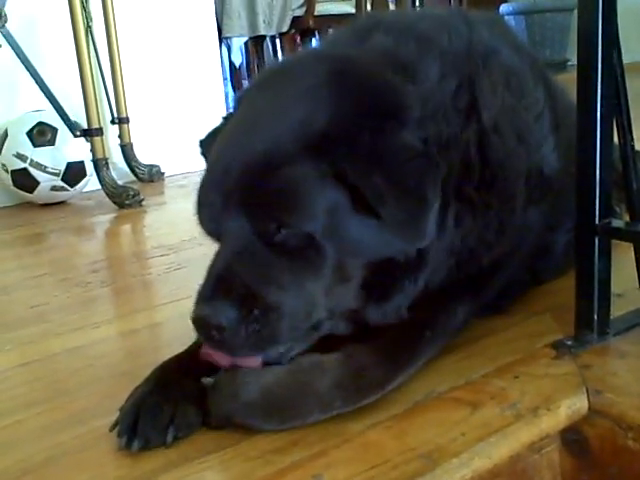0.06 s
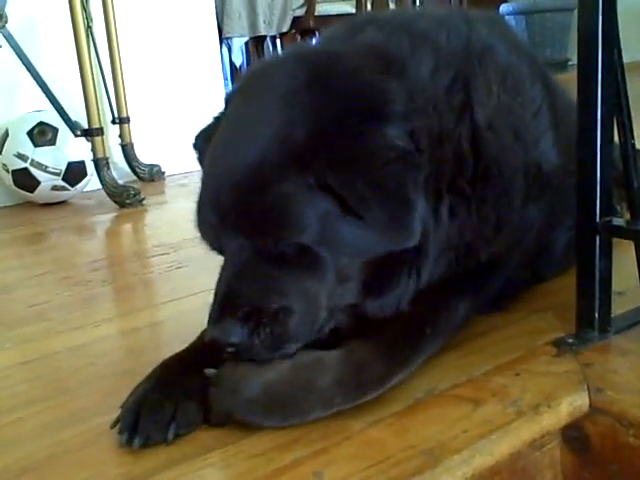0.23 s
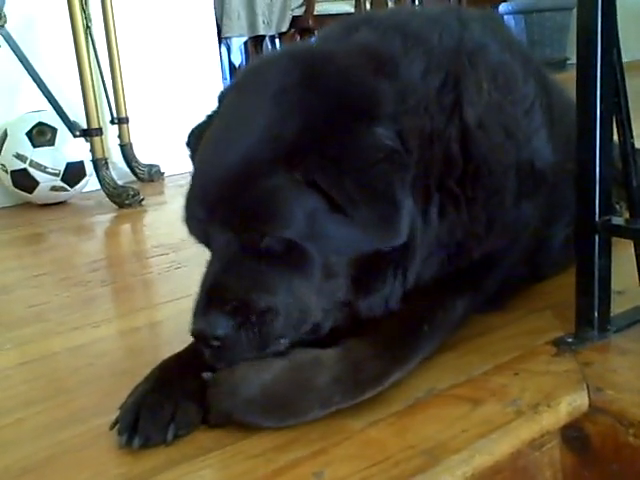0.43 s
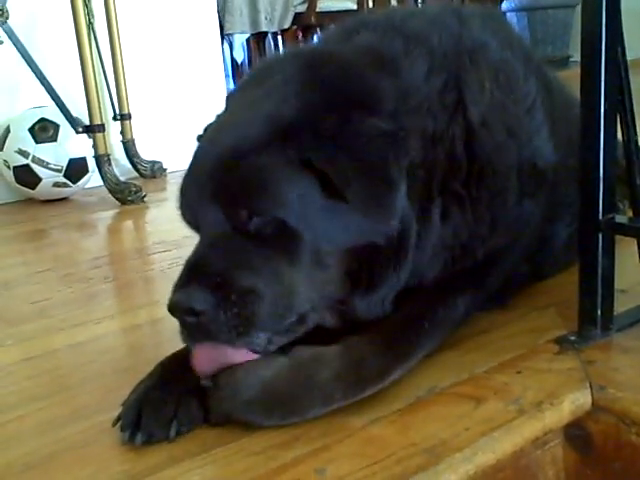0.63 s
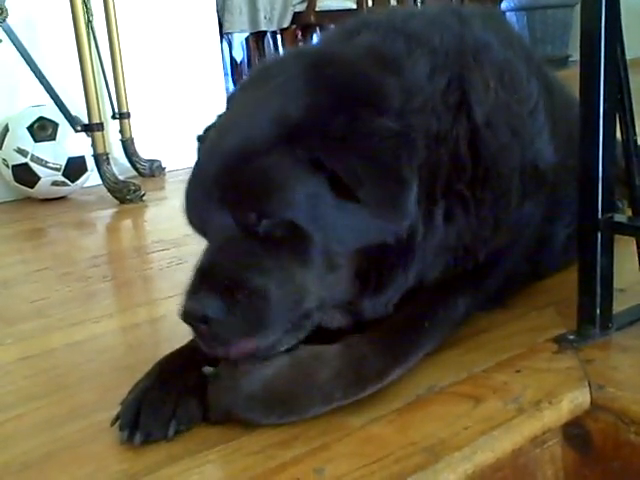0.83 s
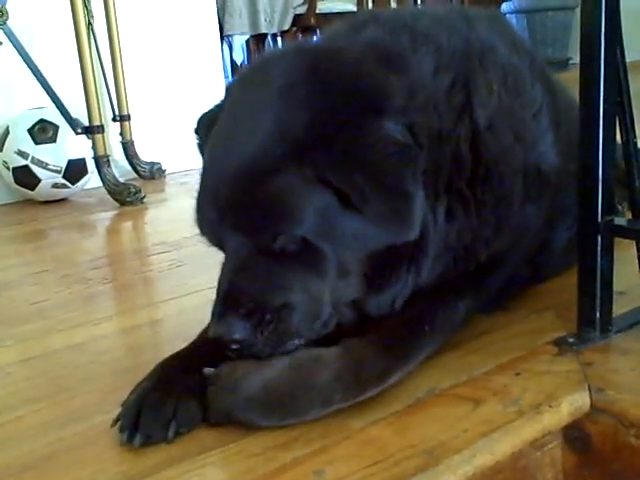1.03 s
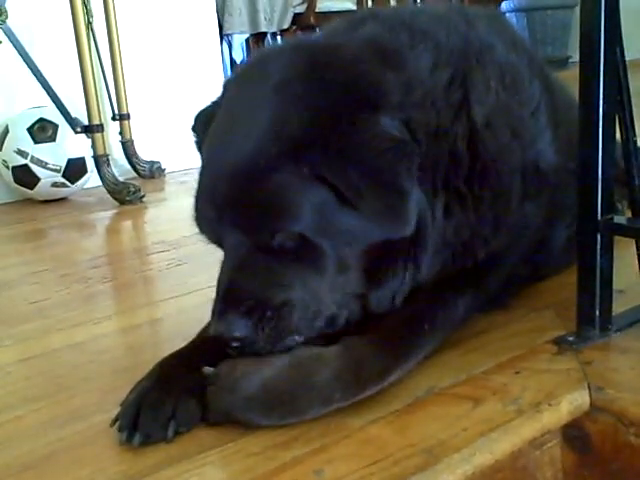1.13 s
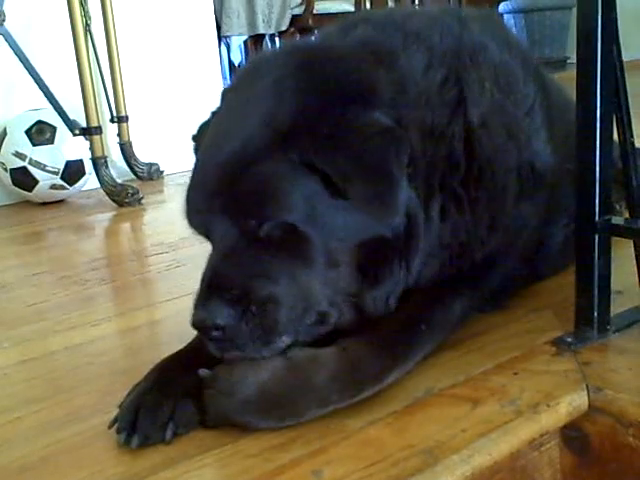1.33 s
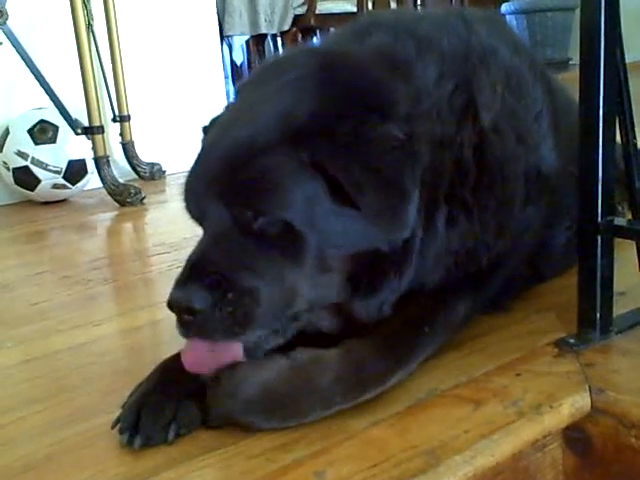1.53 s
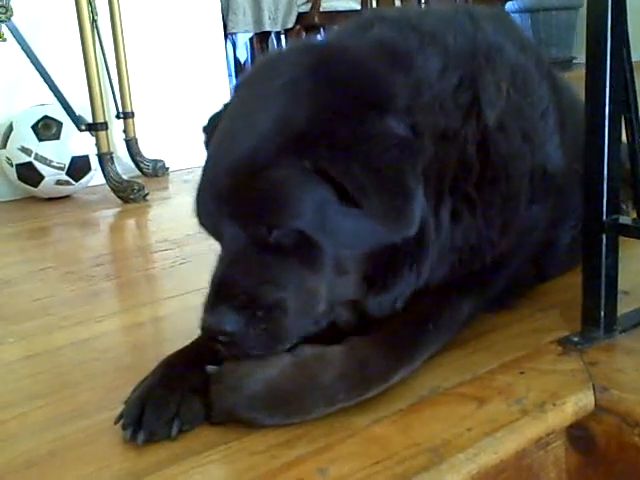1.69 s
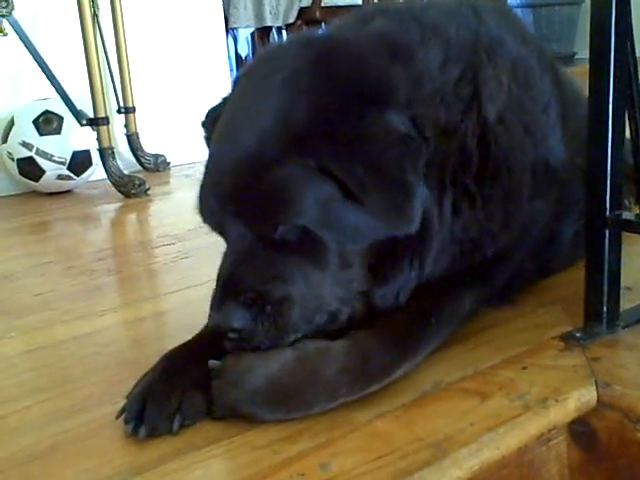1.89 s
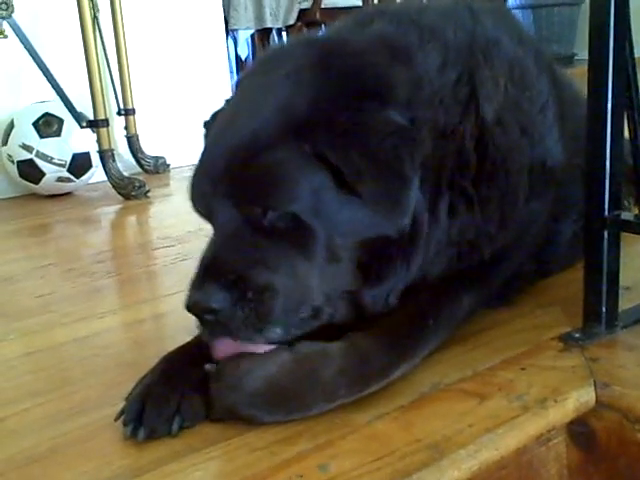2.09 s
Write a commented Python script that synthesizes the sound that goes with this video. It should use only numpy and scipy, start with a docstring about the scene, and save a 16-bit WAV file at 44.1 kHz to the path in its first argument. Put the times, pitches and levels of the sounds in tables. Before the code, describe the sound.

Dog licking its paw with soft wet rasps and clicks, plus four hard knocks on wood

```python
"""Dog licking its paw, and four knocks on wood

A dog licks its paw on a wooden floor: shaped noise rasps softly as tongue on fur, short rings snap as wet clicks.
Four hard knocks on a hollow wooden panel stack noise cracks, a snap near 6.5 kHz, dying panel modes and room tails.
Low rumble, faint hiss and a drone lie beneath, and the knocks overload a small microphone."""
import sys
import numpy as np
from scipy import signal
from scipy.fft import rfft, irfft, next_fast_len
from scipy.io import wavfile

SR = 44100
rng = np.random.default_rng(int(sys.argv[2]) if len(sys.argv) > 2 else 0)


def master_out(mix):
    """Clip the mix to full scale and print it as 16-bit PCM to the path in sys.argv[1]."""
    frames = np.transpose(np.atleast_2d(mix))
    ceiling = np.clip(frames, -1, 1)
    pcm = np.round(ceiling * 32767).astype(np.int16)
    wavfile.write(sys.argv[1], SR, pcm)


def field_ratio(decibels):
    """Amplitude ratio for a level in dB (20 dB per decade); scalars and array-likes work."""
    return 10 ** (np.asarray(decibels, dtype=float) / 20)


N = 94815  # length in samples


def unit(x):
    """Scales a signal to rms 1."""
    return x / np.sqrt(np.mean(x ** 2) + 1e-20)


def along(points, hz):
    """Reads a curve of (Hz, value) points on a log frequency axis."""
    point_hz, value = np.transpose(points)
    return np.interp(np.log(hz + 1), np.log(point_hz + 1), value)


def coloured(x, points):
    """Passes x through a causal minimum-phase filter of (Hz, relative dB) points with mean power gain 1."""
    size = 2 * next_fast_len(len(x) // 2 + 4096)
    gain = field_ratio(np.maximum(along(points, np.fft.rfftfreq(size, 1 / SR)), -70))
    # folding the cepstrum forward in time makes the filter causal
    cepstrum = irfft(np.log(unit(gain)), size)
    cepstrum[1:size // 2] *= 2
    cepstrum[size // 2 + 1:] = 0
    response = np.exp(rfft(cepstrum))
    return irfft(rfft(x, size) * response, size)[:len(x)]


def add(track, start_s, sound):
    """Lays a sound into the track at a time, cut at the track's end."""
    part = track[round(start_s * SR):][:len(sound)]
    part += sound[:len(part)]


def ring(t, hz, db, t60, phase=0):
    """A sine that loses 60 dB in t60 seconds, as a damped resonance does."""
    return field_ratio(db - 60 * t / t60) * np.sin(2 * np.pi * hz * t + phase)


def room_tail():
    """One second of fresh reverberant noise in which each frequency dies at its own speed."""
    # decay time of the room: pitch_hz, t60_s
    decay_times = [(60, 1), (160, 0.49), (420, 0.43), (1100, .5), (2900, 0.47), (7000, 0.44)]
    rise_s = 0.0013
    hz, t, spectrum = signal.stft(rng.standard_normal(SR), SR, nperseg=512)
    decay = field_ratio(-60 * t / along(decay_times, hz)[:, None])
    tail = signal.istft(spectrum * decay, SR, nperseg=512)[1][:SR]
    return tail * (1 - np.exp(-np.arange(SR) / SR / rise_s))


def room_air():
    """Low rumble and faint hiss are filtered noise; narrow noise bands waver as an appliance drone."""
    # colour of the room air: pitch_hz, relative level_db
    air_colour = [(12, -74.5), (20, 5.5), (48, 0.5), (121, -0.5), (282, -11.5), (347, -15), (497, -21),
                  (1100, -29), (1620, -27.5), (2380, -34), (6660, -34), (9300, -43), (12100, -111),
                  (20500, -120)]
    # partials of the drone: pitch_hz, level_db (rms), width_hz
    drone_partials = [(97.9, -50.5, 5.8), (196.8, -57.5, 3), (622, -73.5, 10), (853, -72.5, 17)]
    air_db = -46  # rms
    freqs = np.fft.rfftfreq(N, 1 / SR)
    drone = np.zeros(N)
    for hz, db, width_hz in drone_partials:
        band = np.exp(-((freqs - hz) / width_hz) ** 2)
        drone += field_ratio(db) * unit(irfft(rfft(rng.standard_normal(N)) * band, N))
    return field_ratio(air_db) * coloured(rng.standard_normal(N), air_colour) + drone


def tongue():
    """Friction of the tongue over fur: noise that is part smooth hiss, part saliva crackle."""
    # outline of the strokes: start_s, level_db (rms), crackle share of the power (0-1)
    strokes = [(0, -52, 0.13), (.07, -46.5, 0.4), (.11, -46, 0.35), (.14, -55.5, 0.4), (.165, -47, 0.5),
               (.2, -58, 0), (0.233, -50.5, 0.64), (0.559, -58.5, 0), (.68, -51, 0.6), (.78, -42, 0.09),
               (.83, -53, 0.3), (.87, -52, 1), (.95, -54, 0.73), (1.08, -63.5, .2), (1.129, -56.5, 1),
               (1.2, -54.5, 0.7), (1.26, -56, 0.35), (1.33, -66, .1), (1.39, -47.5, 0.3), (1.44, -50, .1),
               (2.02, -59, .1), (2.08, -66, 0), (2.11, -51.5, 0), (2.15, -56, 0)]
    # colour of the fur's rasp: pitch_hz, relative level_db
    fur_colour = [(1470, -75.5), (2500, -26.5), (3610, -27), (4500, -26.5), (5990, -12), (6540, -7),
                  (7710, -19), (8800, -16.5), (9300, -31.5), (12100, -82), (20500, -120)]
    crackle_per_s, crackle_t60_s, crackle_spread_db = 500, 0.004, 1.8
    start_s, level_db, crackle_share = np.transpose(strokes)
    t = np.arange(N) / SR
    share = np.interp(t, start_s, crackle_share)
    # random pops of uneven strength, each a tiny dying burst of noise
    pops = rng.random(N) < crackle_per_s / SR
    pops = pops * field_ratio(crackle_spread_db * rng.exponential(size=N))
    decay = field_ratio(-60 * t[:400] / crackle_t60_s)
    crackle = np.convolve(pops, decay)[:N] * rng.standard_normal(N)
    rasp = np.sqrt(1 - share) * rng.standard_normal(N) + np.sqrt(share) * unit(crackle)
    return field_ratio(np.interp(t, start_s, level_db)) * coloured(rasp, fur_colour)


def wet_clicks():
    """Saliva threads snap as two short rough rings each with a little room; two bubbles plop as dying sines."""
    # snapping threads: start_s, level_db, low ring pitch_hz, low ring db against the high ring, t60_s
    threads = [(.1195, -36, 5000, -12, .004), (.123, -37, 5000, -12, .004), (.1815, -40, 5000, -12, .003),
               (.864, -41, 5500, 0, .008), (.8734, -21, 4700, -1, .0035), (.8805, -37, 4500, -5, .002),
               (.8895, -36, 5500, -5, .002), (.897, -37, 5000, -12, .008), (.906, -34, 5000, -12, .005),
               (.9077, -35, 5000, -12, .003), (.913, -36, 5000, -12, .005), (.9176, -14, 1500, -19, .0018),
               (.9305, -37, 5300, 0, .005), (.9385, -35, 5500, -9, .005), (.944, -36, 5000, -12, .005),
               (.9457, -35, 5000, -12, .004), (.9515, -36, 5500, -8, .004), (1.1002, -39, 5800, -3, .004),
               (1.1013, -35, 3000, 0, .004), (1.108, -42, 3500, -3, .005), (1.1375, -34, 3000, -7, .003),
               (1.1465, -37, 5000, -3, .003), (1.1494, -17, 5200, -3, .0028), (1.153, -26, 5700, -2, .006),
               (1.176, -38, 3300, 0, .003), (1.1915, -38, 4000, -6, .006), (1.1975, -32, 5500, -3, .004)]
    # saliva bubbles: start_s, level_db, pitch_hz, t60_s
    bubbles = [(0.171, -48, 2050, 0.023), (1.176, -46.5, 660, 0.028)]
    high_ring_hz, rise_s, roughness, room_db = 6500, 0.0002, 0.19, -16
    clicks = np.zeros(N)
    t = np.arange(2000) / SR
    for start_s, db, low_hz, low_db, t60 in threads:
        rings = ring(t, high_ring_hz, 0, t60) + ring(t, low_hz, low_db, t60)
        rough = 1 + roughness * rng.standard_normal(len(t))
        add(clicks, start_s, field_ratio(db) * rings * (1 - np.exp(-t / rise_s)) * rough)
    tail = room_tail()
    clicks += field_ratio(room_db) * signal.fftconvolve(clicks, tail / np.linalg.norm(tail))[:N]
    for start_s, db, hz, t60 in bubbles:
        add(clicks, start_s, ring(t, hz, db, t60))
    return clicks


def crack_and_snap(cracks, snaps, t, start_s, crack_db, snap_hz):
    """Contact of one blow: a noise crack and a bright ring, repeated as wall echoes with scattered pitch."""
    # direct sound, then wall echoes: delay_s, snap level_db, grit level_db (both against the crack level)
    echoes = [(0, 5, 1.5), (.0032, -11, -12), (.0075, -37.5, -23.5), (.0150, -32.5, -21), (.0245, -14, -18),
              (.0278, -4.5, -20), (.0309, -9.5, -21)]
    crack_t60_s = 0.014
    snap_t60_s, snap_rise_s, echo_pitch_scatter = 0.0056, 0.00013, 0.031
    for delay_s, snap_db, grit_db in echoes:
        grit = field_ratio(crack_db + grit_db - 60 * t / crack_t60_s) * rng.standard_normal(len(t))
        add(cracks, start_s + delay_s, grit)
        scatter = echo_pitch_scatter * rng.normal() * (delay_s > 0)
        snap = ring(t, snap_hz * (1 + scatter), crack_db + snap_db, snap_t60_s)
        add(snaps, start_s + delay_s, snap * (1 - np.exp(-t / snap_rise_s)))


def panel_blow(t):
    """Body of one blow: the hollow panel's modes ring with wandering phase over a short thump."""
    # modes of the panel: pitch_hz, relative level_db, t60_s
    panel_modes = [(88.8, -19.5, 1), (94.2, -14, 0.58), (105.8, -3.5, 0.1), (147.3, -3.5, 0.21),
                   (245.7, -15, .2), (329, -9, 0.17), (360.5, -15.5, .3), (394.6, 0.5, 0.088),
                   (428.5, -1, 0.2), (566.3, -4.5, 0.11), (681, -17.5, 0.34), (739, -20, 0.59),
                   (753.5, -26, 0.14), (766, -30, 0.11), (909, -27.5, 0.29), (1167, -35, 0.32)]
    # push of the blow itself: pitch_hz, relative level_db, t60_s
    thump_rings = [(345, 12, .022), (156, 7, 0.02), (1137, -3, 0.018)]
    rise_s, level_scatter_db = 0.0024, 2.5
    wander_rad = 0.35  # rms phase drift after 0.1 s
    modes = np.zeros(len(t))
    for hz, db, t60 in panel_modes:
        phase = wander_rad * np.cumsum(rng.standard_normal(len(t))) / np.sqrt(SR / 10)
        modes += ring(t, hz, db + level_scatter_db * rng.normal(), t60, phase)
    thump = sum(ring(t, hz, db, t60) for hz, db, t60 in thump_rings)
    return modes * (1 - np.exp(-t / rise_s)) + thump


def knocks():
    """Each blow sets off a crack with wall echoes, the panel's body and the room's quick and slow tails."""
    # blows: start_s, crack_db, snap pitch_hz, panel_db, room_db (relative levels)
    blows = [(0.2485, 0, 6810, -2.5, -7.5), (1.4401, -5.5, 6500, -7.5, -14),
             (1.5949, -3.5, 6390, -10.5, -17.5), (1.7472, -1, 5870, -6, -14)]
    # first contacts just before a blow: start_s, relative level_db, t60_s
    lead_ticks = [(.2437, -21, .04), (.2466, -13, .015), (1.4384, -19, .02), (1.4393, -12, .01)]
    # colour of the crack: pitch_hz, relative level_db
    crack_colour = [(500, -56), (1000, -1.5), (1600, -15), (2800, -12.5), (4300, -6.5), (5200, -12.5),
                    (6540, -2), (8000, -16.5), (9300, -14), (12000, -87)]
    # colour of the room's quick answer: pitch_hz, relative level_db
    boom_colour = [(24, -59), (40, -20.5), (91, -8), (154, -16.5), (202, -12), (333, -5.5), (365, 1),
                   (631, -14.5), (740, -12.5), (1400, -29), (4380, -29.5), (6760, -21.5), (9300, -43),
                   (12100, -108.5), (20500, -120)]
    # colour of the slow tail of the house: pitch_hz, relative level_db
    linger_colour = [(60, -19.5), (100, -7), (200, -6.5), (350, 6.5), (450, -2.5), (750, -5), (1100, -15),
                     (1700, -15.5), (3500, -29.5), (6000, -46)]
    panel_delay_s = 0.0016
    linger_db, linger_t60_s = -25.5, 1.19  # level against the quick room tail
    cracks, snaps, panel, boom, linger = np.zeros((5, N))
    t = np.arange(SR) / SR
    short_t = t[:900]
    for start_s, crack_db, snap_hz, panel_db, room_db in blows:
        crack_and_snap(cracks, snaps, short_t, start_s, crack_db, snap_hz)
        add(panel, start_s + panel_delay_s, field_ratio(panel_db) * panel_blow(t))
        add(boom, start_s, field_ratio(room_db) * room_tail())
        slow_decay = field_ratio(room_db + linger_db - 60 * t / linger_t60_s)
        add(linger, start_s, slow_decay * rng.standard_normal(SR))
    for start_s, db, t60 in lead_ticks:
        add(cracks, start_s, field_ratio(db - 60 * short_t / t60) * rng.standard_normal(len(short_t)))
    tails = coloured(boom, boom_colour) + coloured(linger, linger_colour)
    return coloured(cracks, crack_colour) + snaps + panel + tails


def scene():
    """All sources summed at one microphone."""
    return (room_air() + tongue() + wet_clicks() + knocks())[None]


def top_cut(x):
    """Nothing passes above the cut-off."""
    return signal.sosfilt(signal.butter(12, 17140, fs=SR, output="sos"), x)


def record(dry):
    """The small microphone ends near 9 kHz; its input then clips and rolls off gently."""
    mic_stop_hz, rolloff_hz = 9650, 11600
    clip_db, clip_hardness = -3.1, 12
    mic = signal.sosfilt(signal.cheby2(10, 60, mic_stop_hz, fs=SR, output="sos"), dry)
    overload = np.abs(mic / field_ratio(clip_db)) ** clip_hardness
    clipped = mic / (1 + overload) ** (1 / clip_hardness)
    mix = signal.sosfilt(signal.butter(2, rolloff_hz, fs=SR, output="sos"), clipped)
    return top_cut(mix)


dry = scene()
out = record(dry)
master_out(out)
```